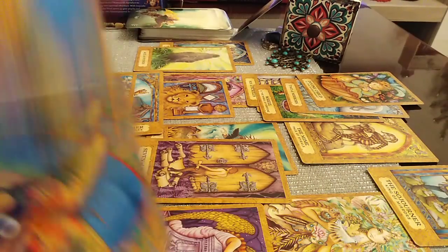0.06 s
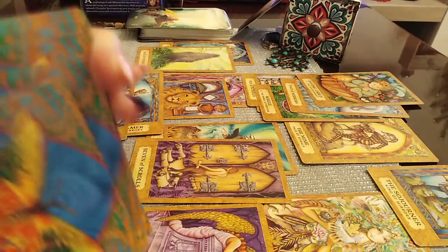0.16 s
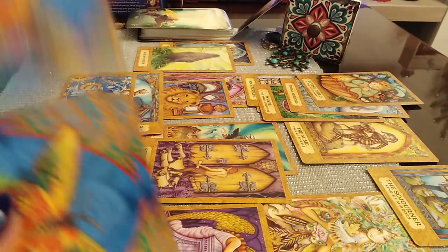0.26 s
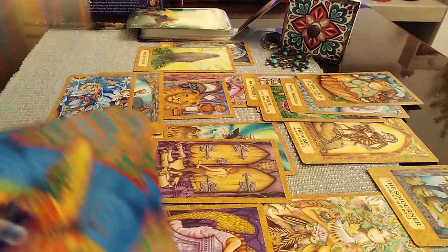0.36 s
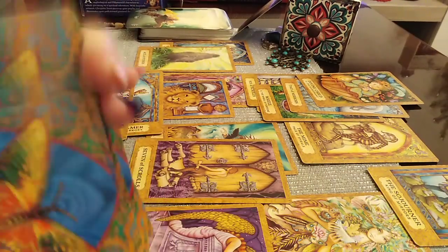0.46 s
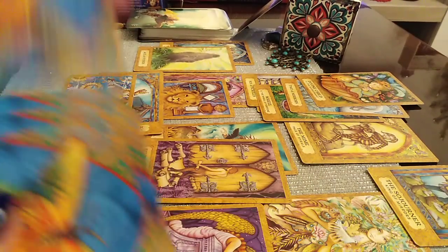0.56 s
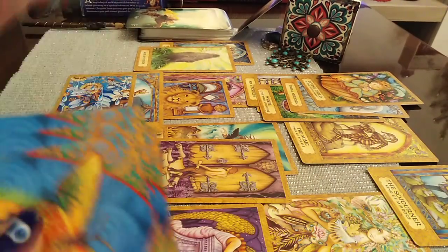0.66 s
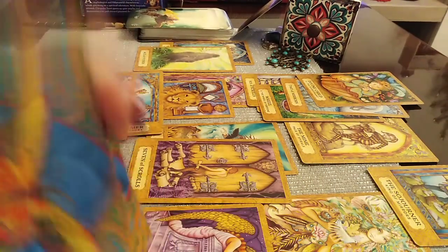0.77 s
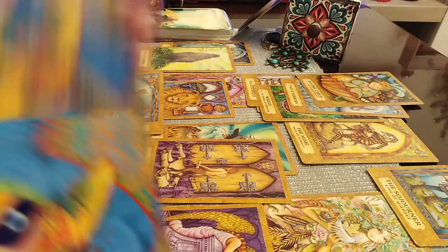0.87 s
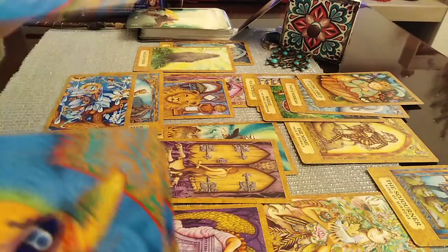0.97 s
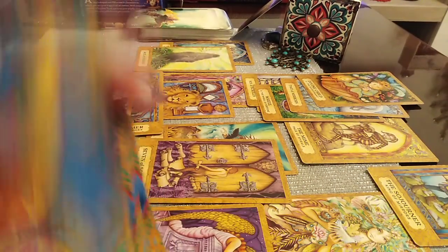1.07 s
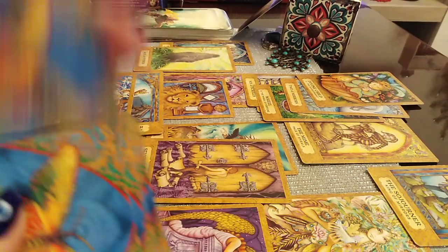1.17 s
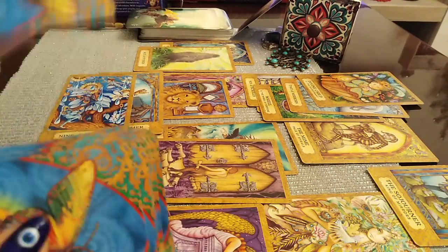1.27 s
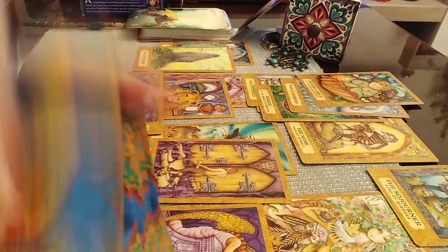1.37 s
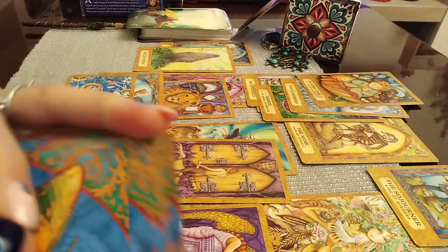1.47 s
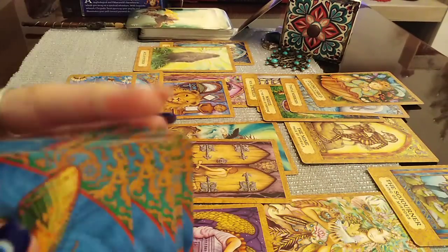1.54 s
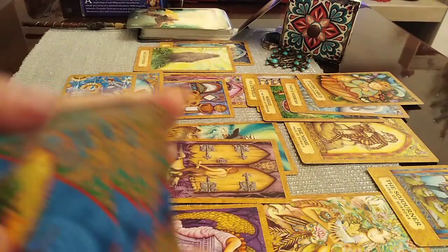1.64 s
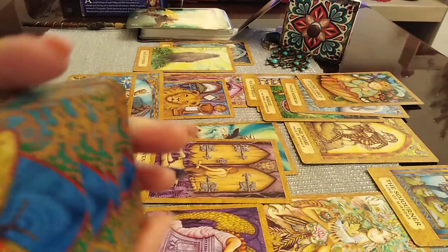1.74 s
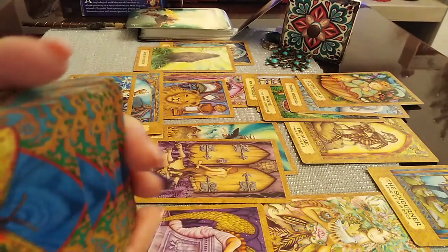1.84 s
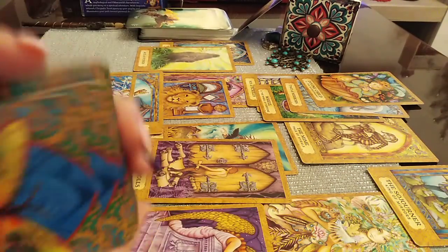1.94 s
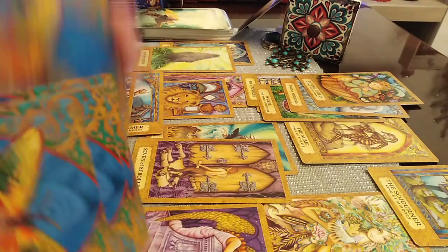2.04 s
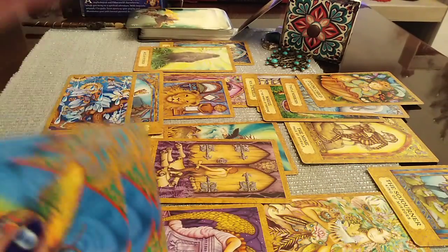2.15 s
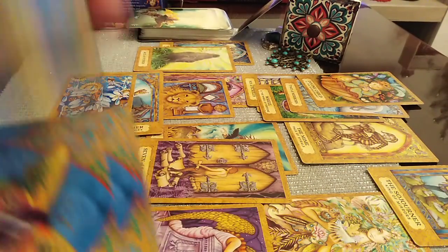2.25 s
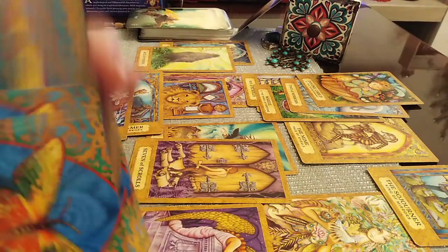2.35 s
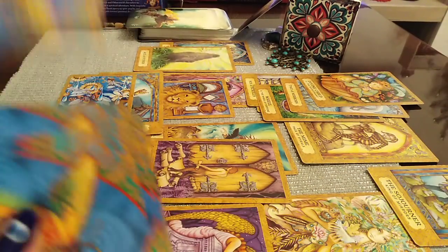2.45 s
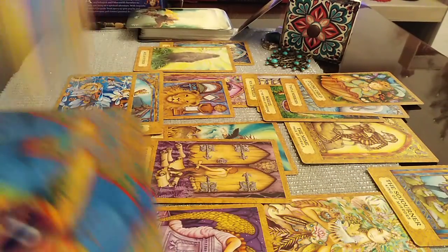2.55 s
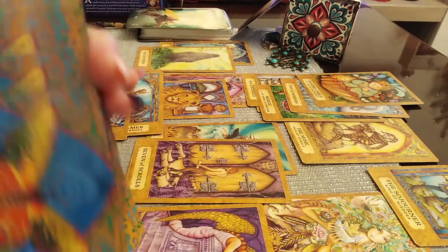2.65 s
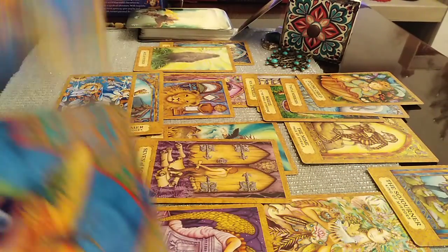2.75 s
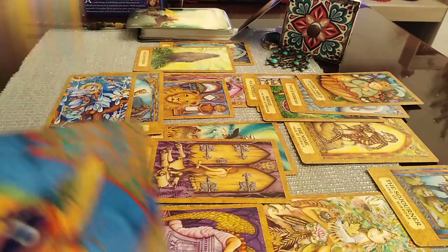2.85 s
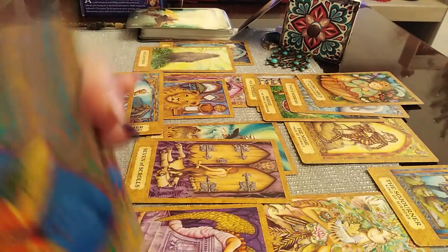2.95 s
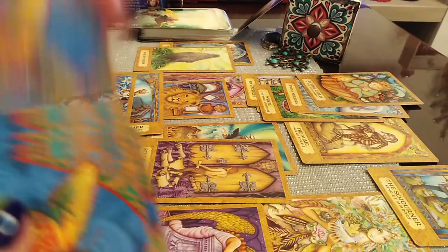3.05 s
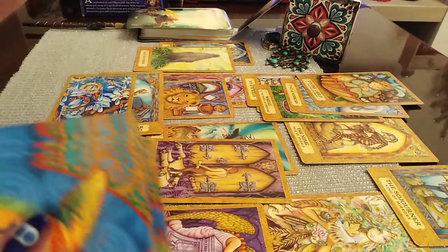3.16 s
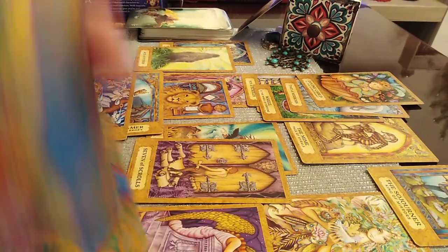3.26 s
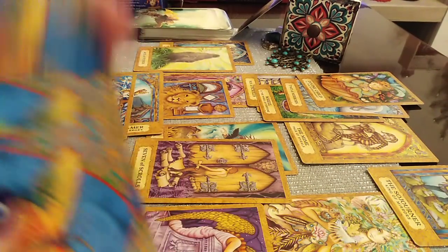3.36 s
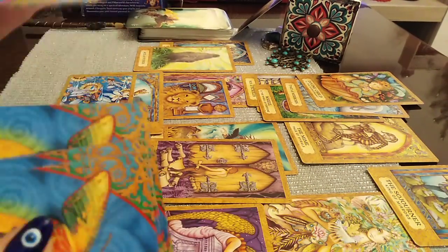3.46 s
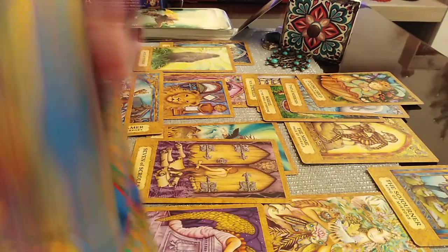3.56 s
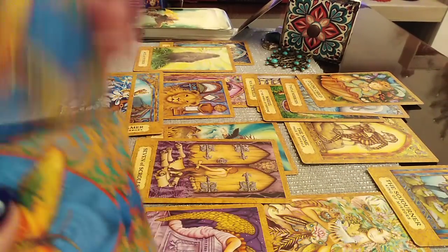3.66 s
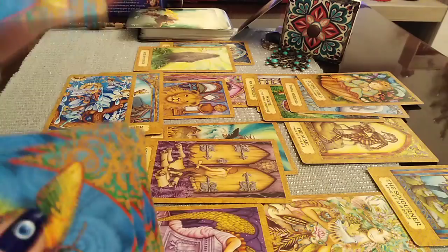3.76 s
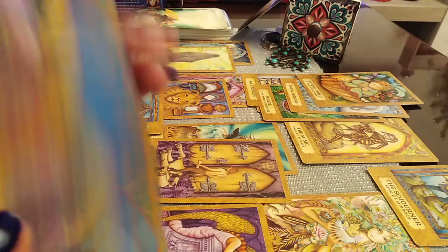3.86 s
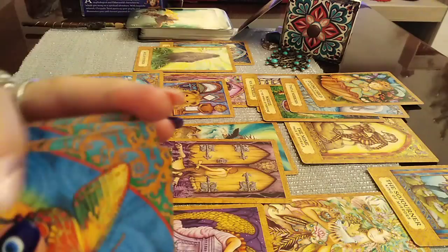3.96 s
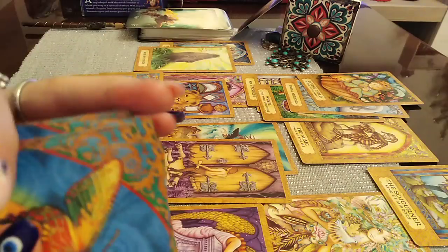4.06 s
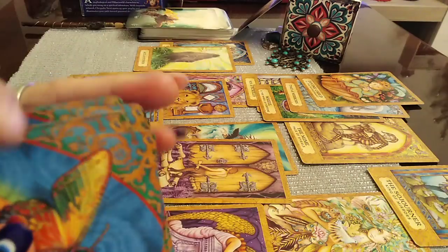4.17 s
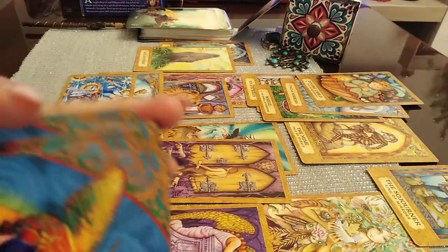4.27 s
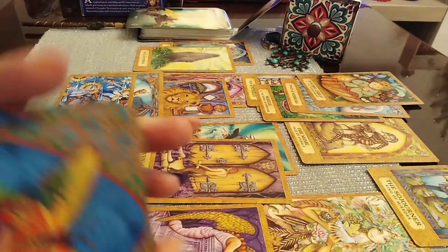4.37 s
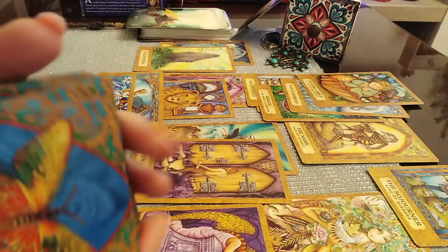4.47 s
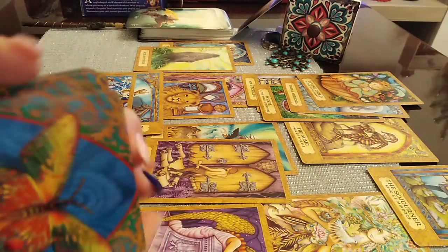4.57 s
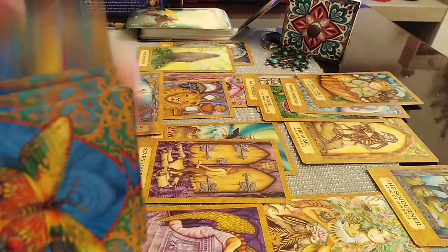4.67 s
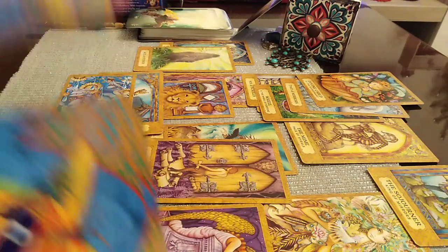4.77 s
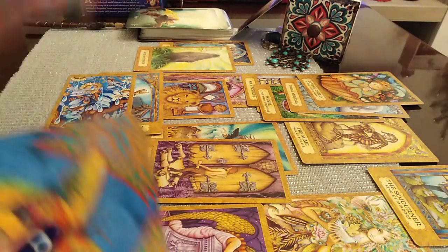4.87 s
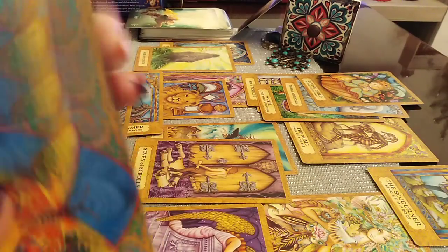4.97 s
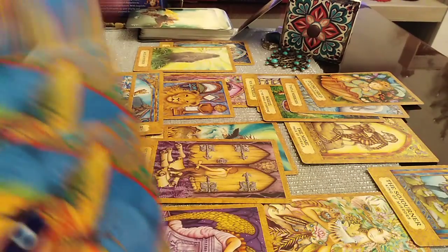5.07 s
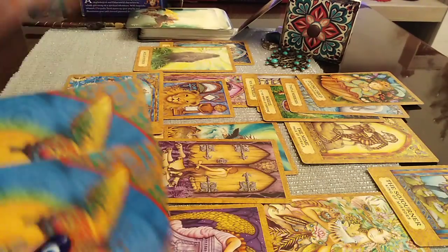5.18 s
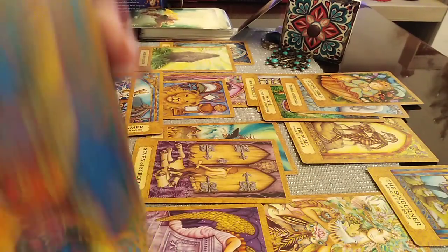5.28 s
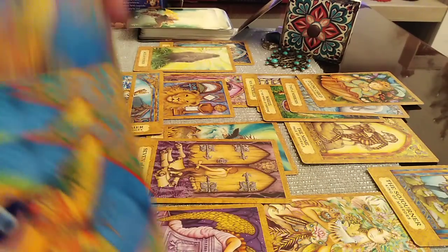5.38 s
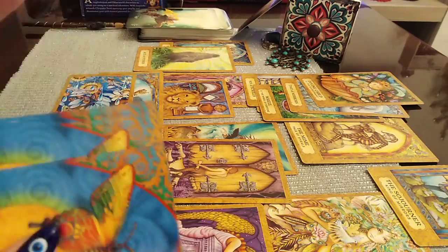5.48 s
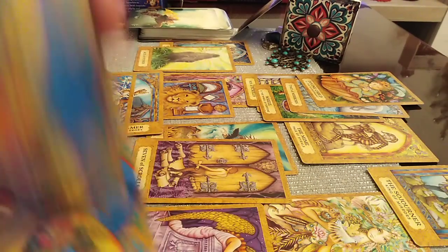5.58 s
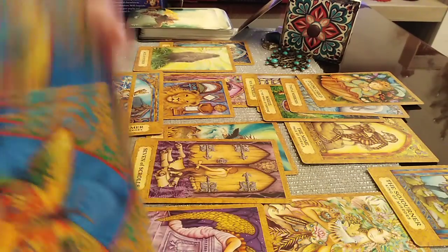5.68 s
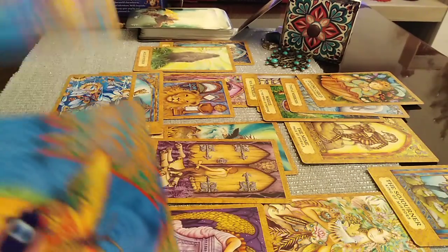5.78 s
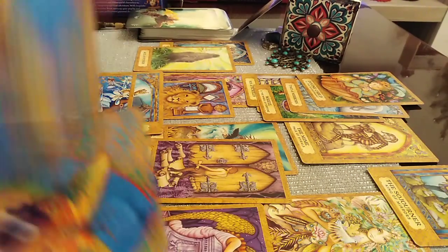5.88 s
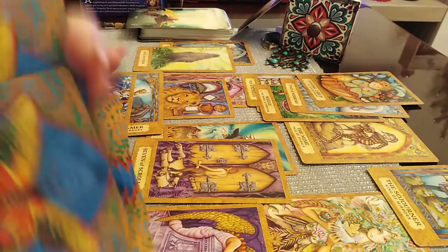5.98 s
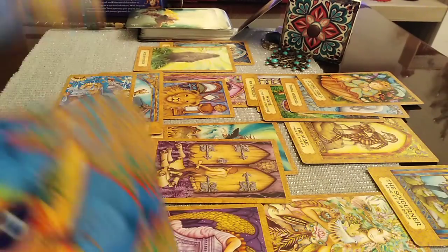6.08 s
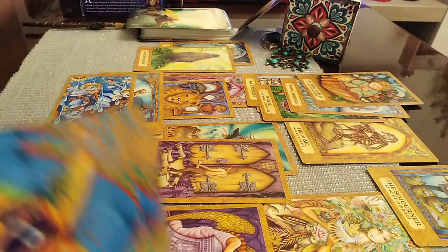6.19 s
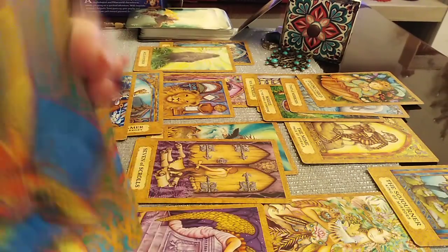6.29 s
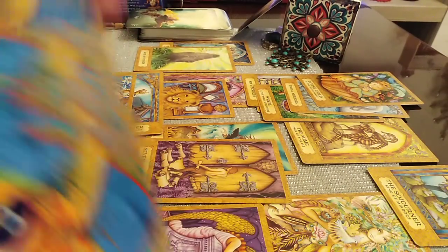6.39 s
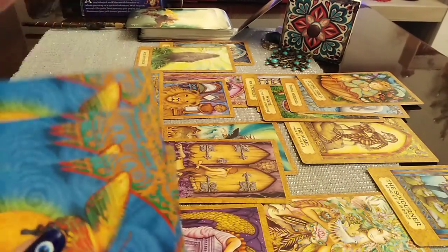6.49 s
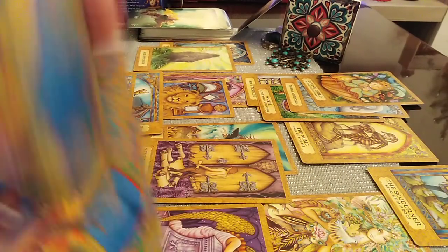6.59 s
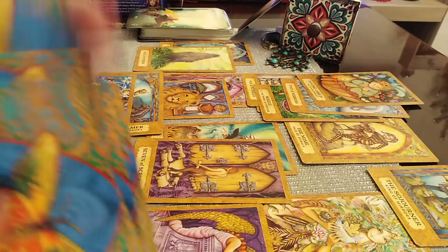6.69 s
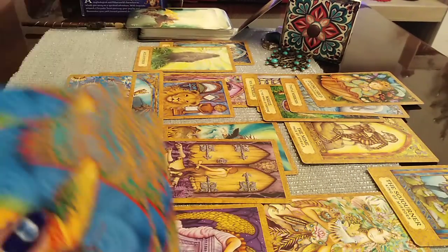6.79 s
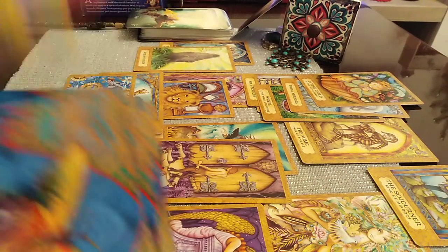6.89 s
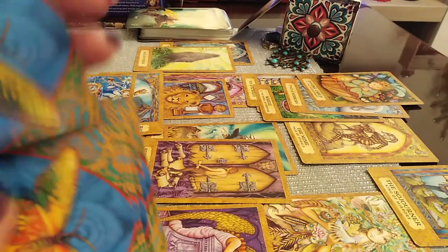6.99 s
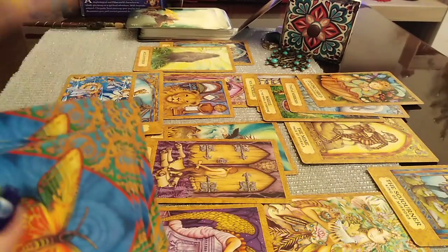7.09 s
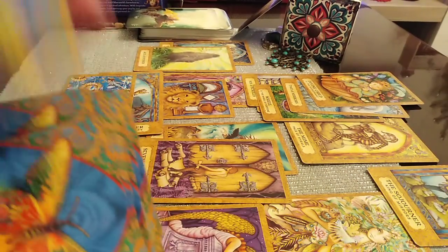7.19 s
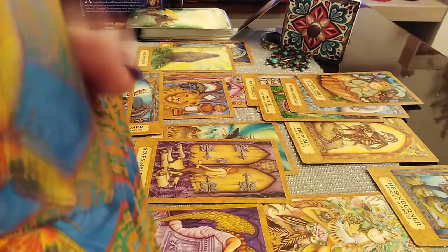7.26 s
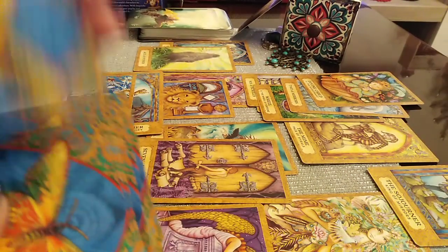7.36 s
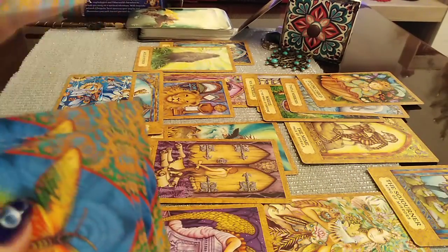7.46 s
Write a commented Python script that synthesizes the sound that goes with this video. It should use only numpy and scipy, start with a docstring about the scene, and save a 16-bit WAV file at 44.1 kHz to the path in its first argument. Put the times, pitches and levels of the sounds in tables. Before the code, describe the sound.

Stiff cards are shuffled overhand very close to a stereo microphone, louder on the right. Crisp snaps, gritty papery slides and soft low puffs come in quick irregular bursts. After about a second and a half the hands pause with faint rubbing, then resume; a second, quieter pause follows around four seconds before the loudest snaps. A small furnished room adds a short reverberation over faint hiss.

```python
"""Overhand card shuffle

Stiff cards are shuffled just right of a two-port microphone, in a small furnished room.
Edges snap (bending modes, twang, knock, fizz), packets slide (coloured gritty noise) and land with
a puff of air (damped low sine); twice the hands pause to square the deck.
Walls answer with decaying noise, one low mode rings, and faint hums and hiss lie beneath.
"""
import sys
import numpy as np
from scipy import signal
from scipy.fft import rfft, irfft, next_fast_len
from scipy.io import wavfile
from scipy.ndimage import uniform_filter1d, map_coordinates

SR = 44100
rng = np.random.default_rng(int(sys.argv[2]) if len(sys.argv) > 2 else 0)


def int16_out(signal):
    """Quantize to a 16-bit WAV file."""
    q = np.round(np.clip(np.atleast_2d(signal).T, -1, 1) * 32767)
    wavfile.write(sys.argv[1], SR, q.astype(np.int16))


N = 332073


def amp(db):
    """dB to gain."""
    return 10 ** (np.asarray(db) / 20)


def unit(x):
    """Scaled to rms 1."""
    return x / np.sqrt(np.mean(x ** 2) + 1e-20)


def along(points, hz):
    """(f/Hz, value) points interpolated on a log frequency axis."""
    f, v = np.transpose(points)
    return np.interp(np.log(hz + 1), np.log(f + 1), v)


def filtered(x, response):
    """x times a complex response of frequency, zero-padded."""
    m = next_fast_len(N + SR // 2)
    return irfft(rfft(x, m) * response(np.fft.rfftfreq(m, 1 / SR)), m)[..., :N]


def resonance(f, hz, width):
    """One causal second-order resonance of peak gain 1."""
    return 1j * f * width / (hz * hz - f * f + 1j * f * width)


def placed(times, rows):
    """Short sounds, one per row, summed at their times."""
    at = np.round(times * SR).astype(int)[:, None] + np.arange(rows.shape[1])
    return np.bincount(at.ravel(), rows.ravel(), N + SR)[:N]


# room and microphone hiss spectrum: [f/Hz, density/dB per Hz]
HISS_SPECTRUM = [(40, 10.5), (120, 3.5), (310, -10.5), (450, -15.5), (3000, -25.5), (14000, -16)]
HISS_RMS_DB = -74


def quiet():
    """Steady hiss and hum of the room: shaped noise, independent at the two ports."""
    noise = rng.standard_normal((2, N))
    return amp(HISS_RMS_DB) * unit(filtered(noise, lambda f: amp(along(HISS_SPECTRUM, f))))


# reverberation: [f/Hz, t60/s]
ROOM_T60 = [(80, 1), (560, 0.36), (3000, 0.36), (12000, 0.34)]


def room(x):
    """Diffuse wall reflections: convolution with noise whose frequencies die at their own speeds."""
    hz, t, z = signal.stft(rng.standard_normal((2, SR // 2)), SR, nperseg=256)
    decay = amp(-60 * t / along(ROOM_T60, hz)[:, None])
    tail = signal.istft(z * decay, SR, nperseg=256)[1]
    tail /= np.linalg.norm(tail[0])
    delayed = np.pad(x, (200, 0))  # samples before the first reflection
    return signal.fftconvolve(delayed[None], tail, axes=1)[:, :N]


BOOM_HZ, BOOM_WIDTH_HZ, BOOM_DB = 325, 9, -4.5


def boom(far):
    """One low room mode rings on: a narrow resonance driven by the cards."""
    return amp(BOOM_DB) * filtered(far, lambda f: resonance(f, BOOM_HZ, BOOM_WIDTH_HZ))


# faint narrow rustles and hums: [t/s, length/s, f/Hz, width/Hz, start level/dB]
HUMS = [(1.618, 0.088, 1118, 338, -62.5), (1.838, 0.026, 520, 100, -70.5), (2.054, .04, 1226, 400, -57),
        (4.314, 0.058, 1000, 495, -60.5), (4.565, .145, 636, 30, -72.5), (7.238, 0.28, 381, 118, -55),
        (7.304, 0.15, 2550, 910, -43.5)]
HUM_FADE_DB = 5  # over its length


def hums():
    """Fading noise through one narrow resonance per row."""
    out, t = np.zeros((2, N)), np.arange(N) / SR
    for s, length, hz, width, db in HUMS:
        tone = unit(filtered(rng.standard_normal((2, N)), lambda f: resonance(f, hz, width) ** 2))
        fade = amp(db - HUM_FADE_DB * (t - s) / length)
        gate = uniform_filter1d(((t > s) & (t < s + length)) * fade, size=400)
        out += gate * tone
    return out


# packets pushed in, swelling, then briefly settling: [t/s, swell length/s, end-of-swell level/dB]
PUSHES = [(0, 0.018, -26), (0.242, .095, -25.5), (0.553, .108, -30), (0.831, 0.028, -27.5),
          (1.157, 0.032, -22), (1.2, 0.067, -23.5), (1.427, 0.074, -35.5), (2.042, .063, -41),
          (2.116, 0.051, -35), (2.345, .03, -50.5), (2.38, .14, -32), (2.697, .132, -34),
          (3.039, .084, -29.5), (3.314, 0.023, -47.5), (3.365, 0.13, -27), (3.643, 0.033, -30.5),
          (3.684, .045, -26.5), (4.931, 0.047, -45.5), (5.109, 0.058, -25), (5.337, 0.027, -35.5),
          (5.395, .1, -28), (5.66, 0.04, -39.5), (5.713, 0.096, -30.5), (6.019, 0.122, -26.5),
          (6.354, 0.0346, -30.5), (6.393, 0.111, -30.5), (6.676, 0.096, -29), (6.731, 0.0937, -27.5),
          (7.032, .051, -37), (7.216, 0.068, -45)]
# cards let go and gliding to rest: [t/s, length/s, start level/dB]
GLIDES = [(.859, 0.043, -32.5), (3.448, 0.036, -25), (3.685, 0.062, -24), (3.91, 0.044, -29),
          (5.057, 0.13, -35.5), (7.37, 0.097, -34.5)]
SWELL_DB, FADE_DB = 15, 13.5  # over a push, over a glide
SWELL_LATE = 1.27  # exponent; over 1 swells mostly near the end
SCUFF_S, SCUFF_DB = 0.026, -16.5  # glide after each snap, re snap
CREEP_S, CREEP_DB = 0.022, -16.5  # push before a snap: end level re snap
FRESH_S = .14  # a snap this long after the last one has no creep
SETTLE_S, SETTLE_DB = 0.019, -9  # glide after each push, re push end


def strokes():
    """Listed and implied contacts as (t/s, length/s, start/dB, end/dB, ramp exponent)."""
    glides = GLIDES + [(s, SCUFF_S, db + SCUFF_DB) for s, db, *_ in SNAPS]
    glides += [(s + n, SETTLE_S, db + SETTLE_DB) for s, n, db in PUSHES]
    creeps = [(s - CREEP_S, CREEP_S, db + CREEP_DB)
              for (s, db, *_), (last, *_) in zip(SNAPS[1:], SNAPS) if s - last < FRESH_S]
    swelling = [(s, n, db - SWELL_DB, db, SWELL_LATE) for s, n, db in PUSHES + creeps]
    return swelling + [(s, n, db, db - FADE_DB, 1) for s, n, db in glides]


# fast slides that hold their level: [t/s, length/s, level/dB, brightness/dB per octave]
RUSHES = [(0.63, 0.0058, -25, -1.5), (0.911, 0.069, -22, -6), (6.108, 0.017, -20.5, -2),
          (7.067, 0.0063, -30, -6), (7.313, 0.049, -37.5, -8.5)]
# deck squared up, one list per pause: [t/s, level/dB, brightness/dB per octave]
SQUARING = [
    [(1.49, -46, -7), (1.53, -42, 1), (1.655, -40, -1.5), (1.68, -35, 2), (1.738, -36.5, 6.5),
     (1.76, -50.5, 3), (1.87, -67, -6.5), (1.94, -60, 10.5), (1.98, -46.5, -4.5), (2.018, -48, -3),
     (2.036, -53.5, 11)],
    [(4.13, -74, 1), (4.15, -60, 0), (4.2, -82.5, -5), (4.23, -63, -1.5), (4.305, -77, -5),
     (4.316, -49, -6), (4.34, -45, -1), (4.526, -64, 2.5), (4.558, -47.5, 4.5), (4.66, -47, 0),
     (4.704, -58, 2.5), (4.734, -44.5, 1), (4.808, -41, -2), (4.83, -29, -3.5)],
]
GENTLE = 0.14  # firmness factor of squaring and rushes
FIRM_DB, LIGHT_DB = -39, -52  # stroke levels that get the tilts below
FIRM_TILT_DB, LIGHT_TILT_DB = -3.5, -0.5  # per octave; firm strokes are duller


def contact():
    """Level/dB, tilt/dB per octave, touch, hold: louder push or glide wins; rushes, then squaring, replace it."""
    level, tilt = np.full(N, -150.), np.zeros(N)
    for s, length, start_db, end_db, late in strokes():
        span = slice(round(s * SR), min(round((s + length) * SR), N))
        ramp = np.linspace(0, 1, span.stop - span.start) ** late
        now_db = start_db + (end_db - start_db) * ramp
        bright = np.interp(max(start_db, end_db), [LIGHT_DB, FIRM_DB], [LIGHT_TILT_DB, FIRM_TILT_DB])
        tilt[span] = np.where(now_db > level[span], bright, tilt[span])
        level[span] = np.maximum(now_db, level[span])
    touch, held = np.ones((2, N))
    for s, length, db, bright in RUSHES:
        span = slice(round(s * SR), round((s + length) * SR))
        level[span], tilt[span], held[span] = db, bright, GENTLE
    for s, db, bright in map(np.transpose, SQUARING):
        at = np.arange(round(s[0] * SR), round(s[-1] * SR))
        level[at] = np.interp(at / SR, s, db)
        tilt[at] = np.interp(at / SR, s, bright)
        touch[at] = GENTLE
    return level, tilt, touch, held


# friction spectrum: [f/Hz, density/dB per Hz]
RUB_SPECTRUM = [(60, -6.5), (300, -17.5), (1200, -7), (2400, -3.5), (5000, -1), (9000, 0), (14000, 1)]
EDGE_HZ = 14300  # start of the treble shoulder


def slide(grit_db, patchy_db):
    """Friction noise; firm strokes are duller, catch more and reach lower."""
    level, tilt, touch, held = contact()
    firm = touch * held * np.clip((level + 76) / 30, 0, 1)
    knots = rng.standard_normal((2, N // 64 + 2))
    fast_catches = 2.4 * knots[0].repeat(64)[:N]
    slow_catches = 1.5 * map_coordinates(knots[1], [np.arange(N) / 300])
    grit = amp(grit_db * rng.exponential(size=N)) * rng.standard_normal((2, N))
    rub = filtered(amp(firm * (fast_catches + slow_catches)) * grit, lambda f: amp(along(RUB_SPECTRUM, f)))

    hz, t, z = signal.stft(rub / np.std(rub), SR, nperseg=128)
    f = hz[:, None]

    def frames(control):
        """Control read at the frame times."""
        return np.interp(t * SR, np.arange(N), control)

    colour = amp(frames(tilt) * np.log2((f + 300) / 5000))
    band = (hz > 1500) & (hz < EDGE_HZ)
    z *= colour / np.sqrt(np.mean(colour[band] ** 2, axis=0))  # tilt keeps the rms band gain
    z *= amp(-16 * (1 - frames(firm)) / (1 + (f / 2600) ** 4))  # a light touch hardly bends the card
    z *= amp(-10 * (1 - frames(touch)) / (1 + (10500 / (f + 1)) ** 6))  # slow squaring lacks top fizz
    patches = uniform_filter1d(rng.standard_normal(z.shape[1:]), size=4, axis=0)
    patches = uniform_filter1d(patches, size=24, axis=1)
    z *= amp(patchy_db * unit(patches))  # the area in contact keeps changing
    hiss = signal.istft(z, SR, nperseg=128)[1][:, :N]
    return uniform_filter1d(amp(level), size=160) * hiss


# packets slapping down and pumping air: [t/s, peak level/dB]
PUFFS = [(0.032, -23), (0.337, -33), (0.513, -38), (0.554, -28.5), (0.631, -34), (0.667, -26.5),
         (0.857, -26.5), (1.171, -29.5), (1.272, -28.5), (1.434, -36), (1.69, -60), (1.865, -62),
         (2.091, -43), (2.161, -39.5), (2.361, -47.5), (2.406, -33), (2.495, -25.5), (2.72, -47),
         (2.792, -36.5), (3.039, -28), (3.155, -37.5), (3.376, -24.5), (3.495, -24), (3.698, -23),
         (3.74, -28.5), (3.986, -39.5), (4.824, -48.5), (5.024, -24), (5.064, -28), (5.161, -25),
         (5.383, -26), (5.493, -32), (5.713, -29), (5.847, -35), (6.043, -27), (6.128, -28.5), (6.379, -25),
         (6.468, -33.5), (6.516, -25), (6.699, -31.5), (6.839, -31), (7.026, -29.5), (7.06, -35.5),
         (7.391, -30.5)]


def puffs():
    """Air squeezed from between the cards: about two soft low cycles of a damped sine."""
    s, db = (c[:, None] for c in np.transpose(PUFFS))
    hz = 112 * amp(1.6 * rng.standard_normal(s.shape))
    t = np.arange(SR // 8) / SR
    envelope = np.exp(-hz * t / 0.5) * (1 - np.exp(-t / 0.00032))
    gain = -amp(db + 13.0)  # 13 dB makes up for the damping
    return placed(s[:, 0], gain * np.sin(2 * np.pi * hz * t) * envelope)


# card edges letting go or striking: [t/s, peak level/dB, low knock re peak/dB, strongest bending f/Hz]
SNAPS = [(0.0291, -13.5, -19.5, 2480), (0.0355, -22.5, -9.5, 1220), (0.18, -19.5, -5, 1730),
         (0.201, -12.5, -24, 2120), (0.231, -15.5, -17, 4770), (0.3328, -29.5, -1.5, 1090),
         (0.5154, -21, -6.5, 2540), (0.541, -21, -16, 4650), (0.551, -17.5, -19.5, 1750),
         (0.5607, -21.5, -17, 2690), (0.6642, -23.5, -10.5, 1110), (0.842, -10.5, -19.5, 1890),
         (0.9142, -16.5, -34.5, 2580), (0.9682, -22, -12, 2410), (0.9871, -29.5, -5, 1800),
         (1.1401, -19, -18, 2030), (1.1771, -11, -21, 2020), (1.2702, -32, -3, 1660),
         (1.441, -39, -29.5, 4370), (1.4779, -27.5, -21.5, 3420), (1.481, -25.5, -31, 3530),
         (1.999, -46, -29.5, 2020), (2.0908, -39, -12, 1190), (2.158, -30.5, -31, 5240),
         (2.391, -15.5, -33, 1570), (2.4899, -37, -2, 2600), (2.5204, -26, -10, 2420),
         (2.7144, -34, -34, 2690), (2.8022, -26.5, -21.5, 2580), (2.824, -24.5, -13.5, 4970),
         (3.019, -12, -21, 1730), (3.035, -18.5, -28, 2390), (3.1579, -18.5, -17.5, 1810),
         (3.3658, -17, -11, 2420), (3.3764, -21, -13.5, 2430), (3.4012, -29.5, -11, 1700),
         (3.492, -17.5, -14, 1170), (3.686, -21, -12.5, 1680), (3.7409, -31.5, 1.5, 1800),
         (3.9084, -23.5, -21.5, 2080), (3.9845, -17, -31, 2210), (4.3178, -51, -34, 1210),
         (4.7645, -44.5, -22.5, 4310), (4.8266, -27.5, -11.5, 5440), (5.008, -10, -19, 2750),
         (5.0254, -12.5, -15.5, 3570), (5.0476, -6.5, -27, 1830), (5.1191, -23, -8.5, 1680),
         (5.1621, -30, -3, 1250), (5.3695, -9, -23.5, 2860), (5.3906, -20.5, -14, 4460),
         (5.4474, -28, -8, 2510), (5.457, -25.5, -5, 1770), (5.4941, -27, -6.5, 2630),
         (5.698, -22.5, -14, 2630), (5.7151, -15, -19.5, 1690), (5.7262, -27, -15, 4600),
         (5.7929, -24, -16, 2120), (5.8219, -20, -23.5, 2710), (5.8418, -22.5, -13.5, 2700),
         (5.848, -20.5, -21, 3700), (6.0476, -27, -29, 2480), (6.107, -23.5, -20, 2030),
         (6.1364, -22.5, -12.5, 2240), (6.3715, -33.5, -13.5, 1620), (6.5149, -21.5, -14.5, 4400),
         (6.7022, -31, -9, 1680), (6.7239, -21, -16, 2100), (6.7758, -25.5, -16.5, 1670),
         (6.843, -15, -15.5, 1860), (6.9972, -10.5, -47, 5570), (7.008, -20.5, -4, 1850),
         (7.014, -16.5, -31, 1930), (7.0629, -27.5, -11.5, 4670), (7.22, -30.5, -43, 4200),
         (7.2895, -26.5, -42, 4640), (7.3102, -24.5, -46, 2420), (7.3786, -32, -13, 2630),
         (7.4331, -27, -15.5, 4580)]
# bending modes of a card: [f/Hz, width/Hz, level/dB]
BENDING_MODES = [(2010, 800, -4.5), (2836, 660, 3.5), (4530, 1300, 2.5)]
FAVOUR_DB = 5  # mode loss per octave from the strongest bending
LEAD_S, PUSH_S = .002, .00005  # edges slip before the push; push time constant
RATTLE_T60_S, RATTLE_SCATTER_DB = 0.024, 2  # median, spread from snap to snap
FIZZ_DB, FIZZ_GROWS = -12, 0.65  # level at a 0 dB snap, dB per dB of snap
TWANG_DB, TWANG_T60_S = -3.5, .007


def snaps():
    """An inward push amid ragged edge rattle excites bending modes, a twang, a dull knock and a fizz."""
    s, db, knock_db, hz = (c[:, None] for c in np.transpose(SNAPS))
    t60 = RATTLE_T60_S * amp(RATTLE_SCATTER_DB * rng.standard_normal(s.shape))
    t = np.arange(SR // 16) / SR - LEAD_S
    before, after = np.minimum(t, 0), np.maximum(t, 0)
    push = -4.5 * (after / PUSH_S) * np.exp(1 - after / PUSH_S)
    fade = amp(-60 * after / t60 + 60 * before / 0.0033)
    lumps = amp(2.16 * rng.standard_normal((len(s), len(t) // 24 + 1)))
    lumps = lumps.repeat(24, axis=1)[:, :len(t)]
    rattle = fade * lumps * rng.standard_normal((2, 3) + fade.shape)  # (port, use, snap, sample)
    at = s[:, 0] - LEAD_S

    bend = 0
    for k, (mode_hz, width, mode_db) in enumerate(BENDING_MODES):
        gain = amp(db + mode_db - FAVOUR_DB * np.abs(np.log2(mode_hz / hz)))
        drive = [placed(at, gain * (push + r[0])) for r in rattle]
        bend = bend + (-1) ** k * filtered(drive, lambda f: resonance(f, mode_hz, width))

    knock_gain = amp(db + knock_db + 15.0)
    drive = [placed(at, knock_gain * (push + 1.66 * r[1])) for r in rattle]
    knock = filtered(drive, lambda f: resonance(f, 220, 1100))

    fizz_gain = amp(FIZZ_DB + FIZZ_GROWS * db)
    drive = [placed(at, fizz_gain * (0.5 * push + r[2] * fade ** 0.4)) for r in rattle]
    fizz = filtered(drive, lambda f: resonance(f, 9300, 16000) ** 2)

    # free end of the card, at its strongest bending
    ring = -amp(db + TWANG_DB - 60 * after / TWANG_T60_S) * np.sin(2 * np.pi * hz * after)
    return bend + knock + fizz + placed(at, ring)


# left port shading: [f/Hz, level/dB]
LEFT_SHADE = [(60, -25), (250, -13), (2400, -11.5), (5000, -5.5), (8000, -3.5), (14000, -36)]
# left-right likeness: [f/Hz, coherence 0-1]
LIKENESS = [(100, 0.75), (600, .93), (2500, 0.073), (14000, 0.014)]
LEFT_LAG_S = 16 / SR


def ports(pair):
    """The left port hears the cards later, shaded by the camera and partly from other edges."""
    def left_path(f):
        """Shading and delay on shared and separate parts."""
        same = np.clip(along(LIKENESS, f), 0, 1)
        path = amp(along(LEFT_SHADE, f)) * np.exp(-2j * np.pi * f * LEFT_LAG_S)
        return path * [same, np.sqrt(1 - same ** 2)]

    left = filtered(pair, left_path).sum(axis=0)
    return np.array([left, pair[0]])


def scene():
    """Cards heard directly and from the walls, over the hiss."""
    cards = snaps() + puffs() + hums() + slide(grit_db=2.3, patchy_db=3)
    # small cards radiate little bass across the room
    far = filtered(cards[0], lambda f: 1j * f / (220 + 1j * f))
    walls = amp([[-17], [-16]]) * room(far)  # left, right
    return ports(cards) + walls + boom(far) + quiet()


TOP_HZ = 15400  # band limit


def record(dry):
    """No deep bass, a steep treble shoulder, nothing above the band limit."""
    def response(f):
        """Fifth-order high-pass times shoulder and cutoff."""
        bass = (1j * f / (50 + 1j * f)) ** 5
        shoulder = amp(-np.clip((f - EDGE_HZ) / 16, 0, 45))
        return bass * shoulder * (f < TOP_HZ)

    return filtered(dry, response)


dry = scene()
out = record(dry)
int16_out(out)
```